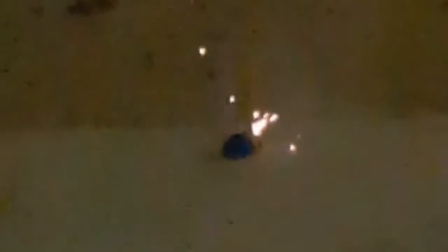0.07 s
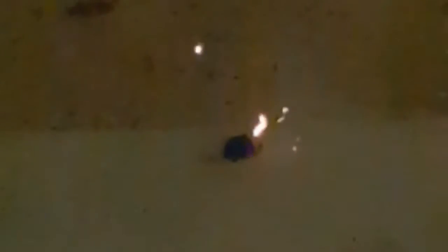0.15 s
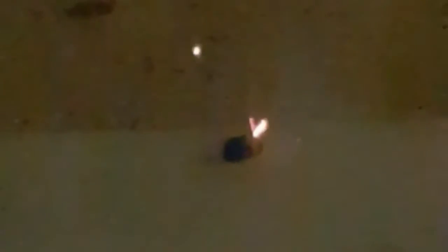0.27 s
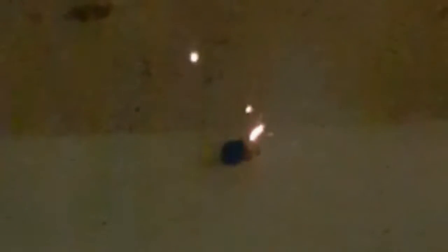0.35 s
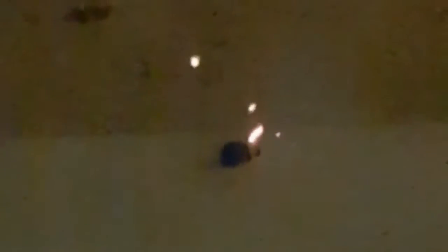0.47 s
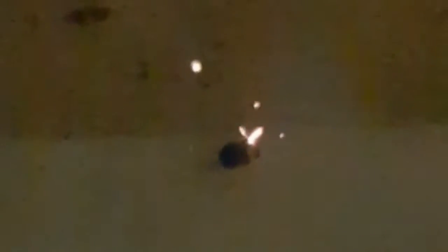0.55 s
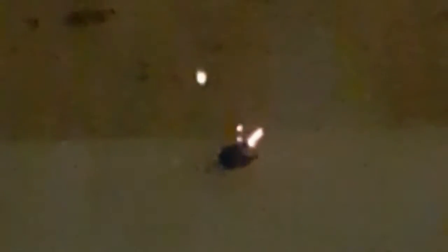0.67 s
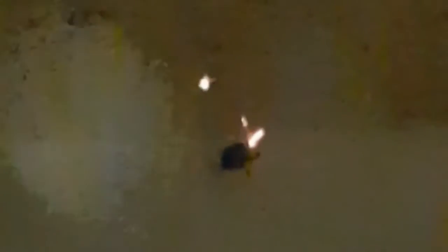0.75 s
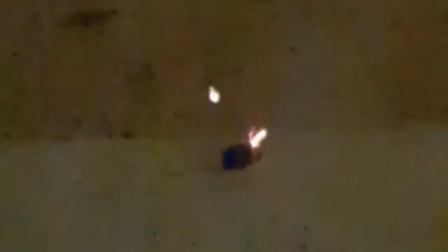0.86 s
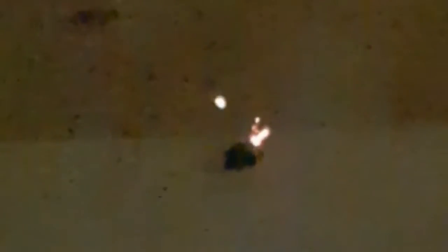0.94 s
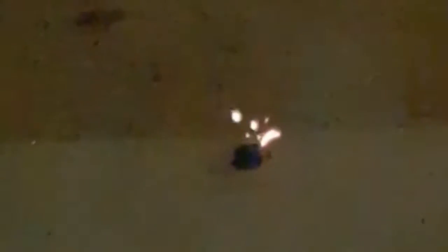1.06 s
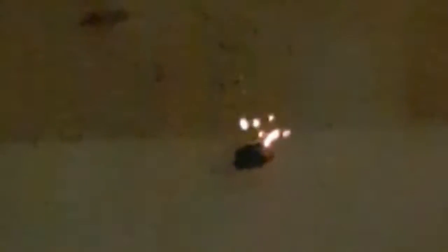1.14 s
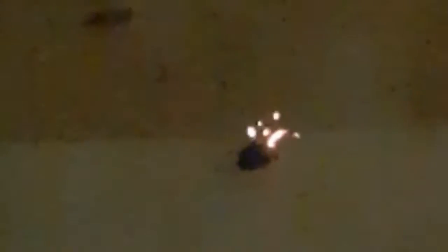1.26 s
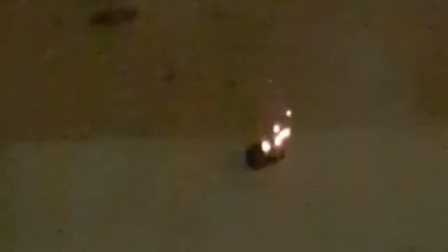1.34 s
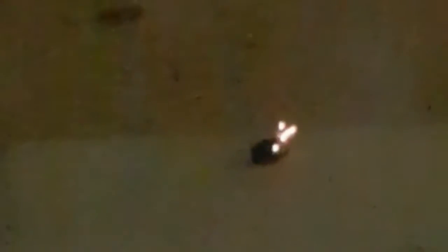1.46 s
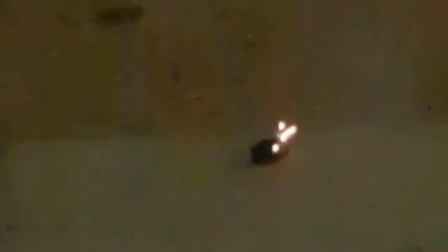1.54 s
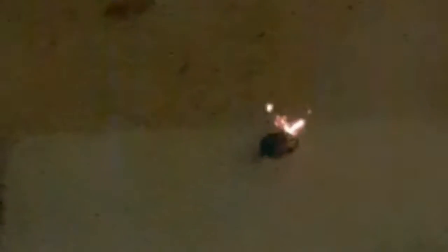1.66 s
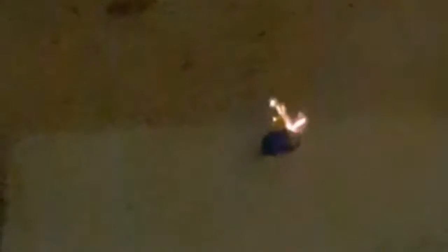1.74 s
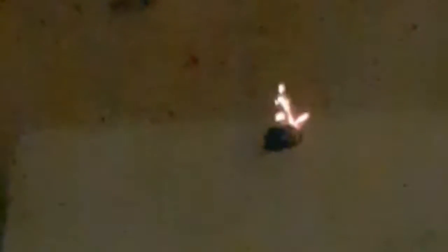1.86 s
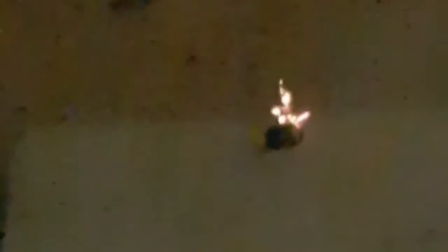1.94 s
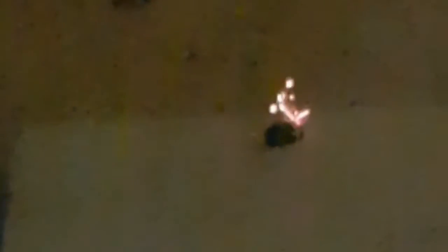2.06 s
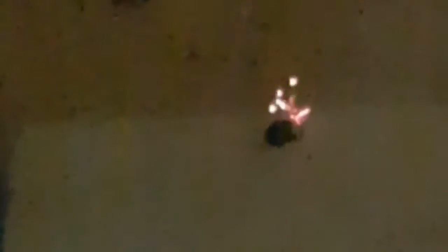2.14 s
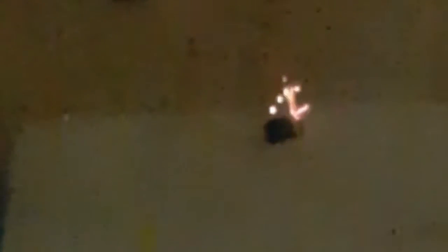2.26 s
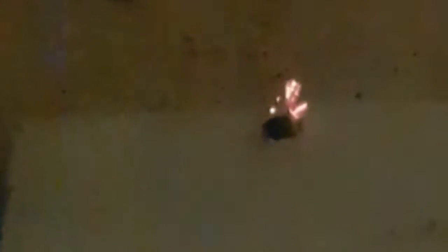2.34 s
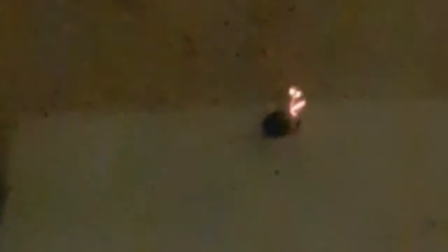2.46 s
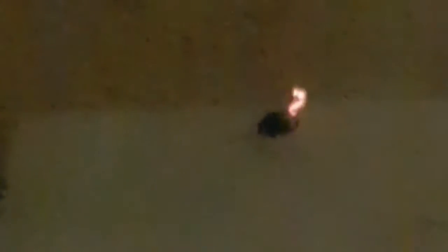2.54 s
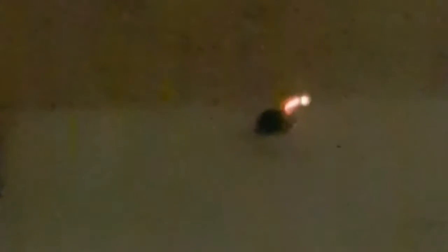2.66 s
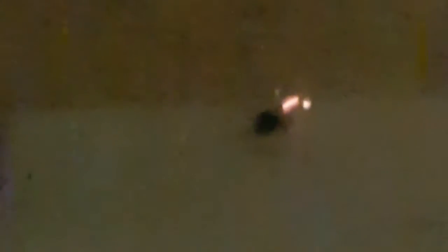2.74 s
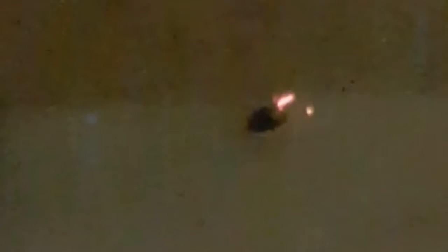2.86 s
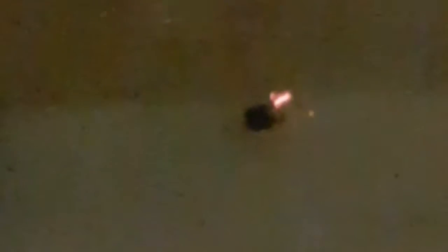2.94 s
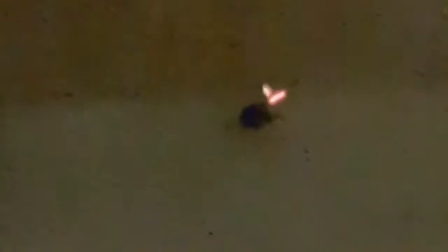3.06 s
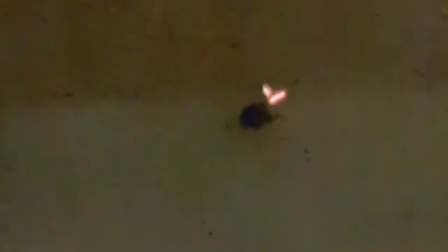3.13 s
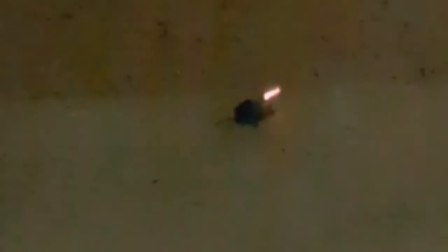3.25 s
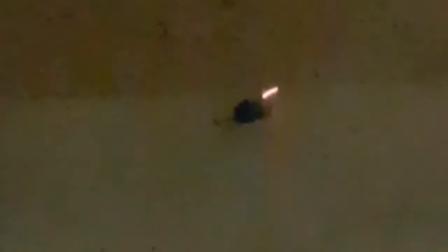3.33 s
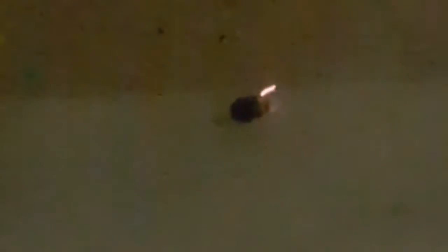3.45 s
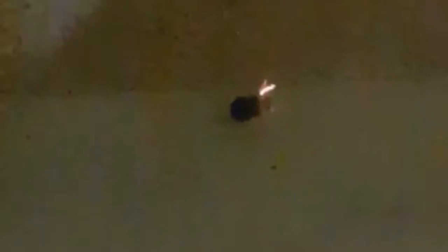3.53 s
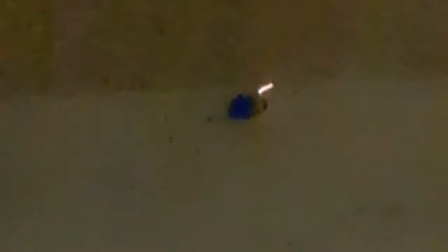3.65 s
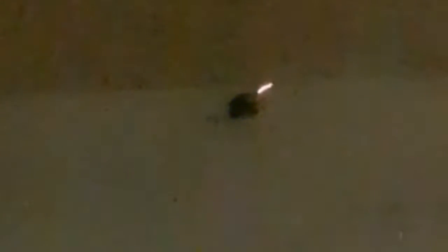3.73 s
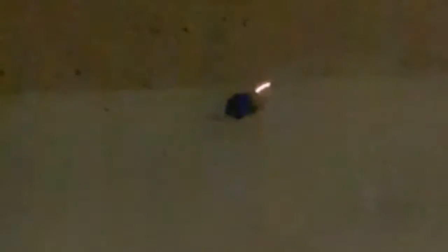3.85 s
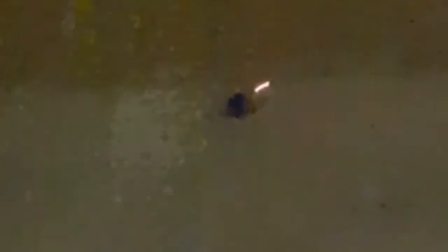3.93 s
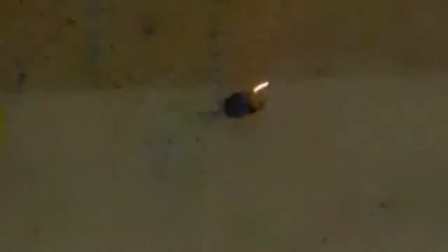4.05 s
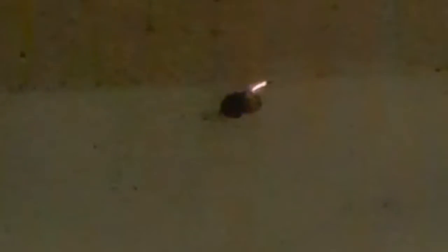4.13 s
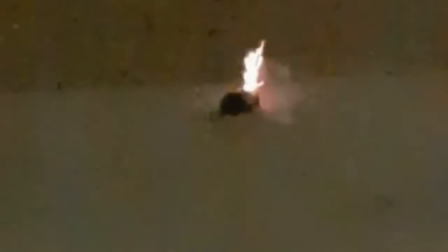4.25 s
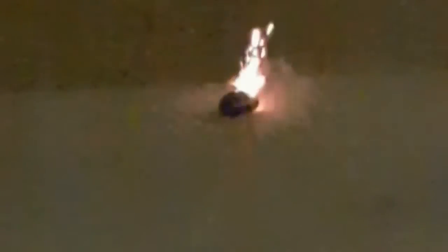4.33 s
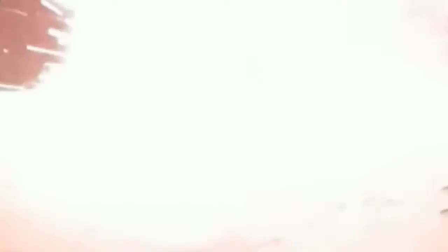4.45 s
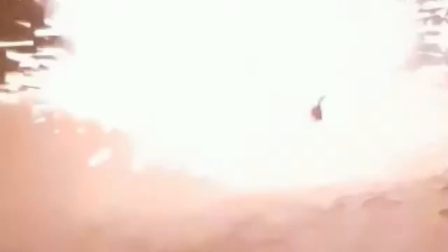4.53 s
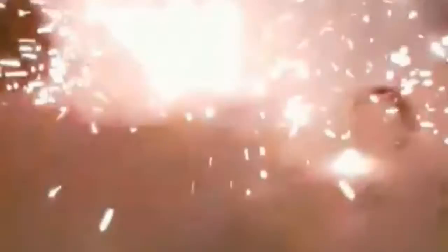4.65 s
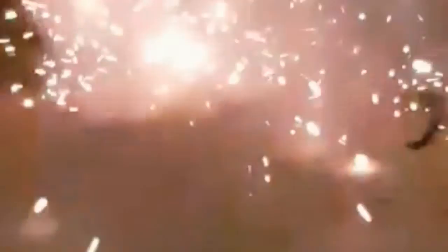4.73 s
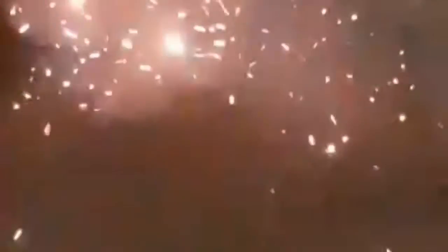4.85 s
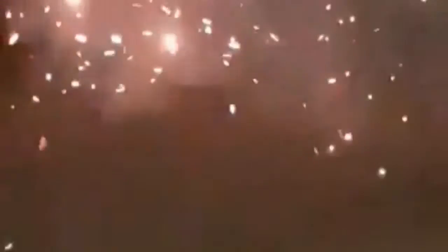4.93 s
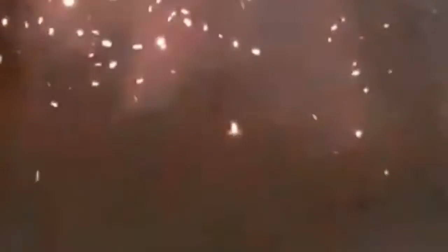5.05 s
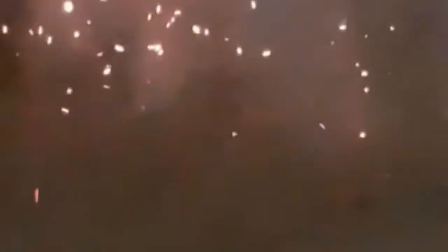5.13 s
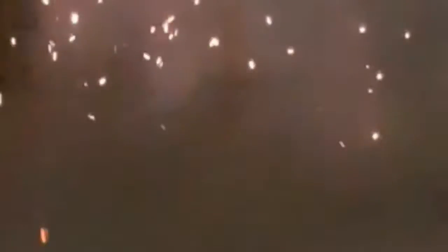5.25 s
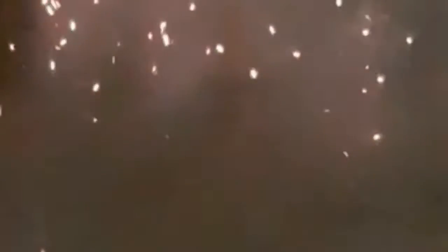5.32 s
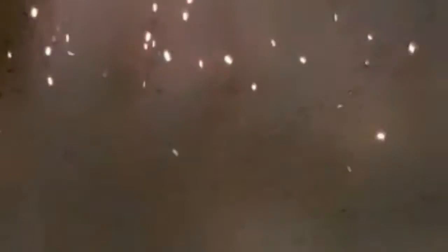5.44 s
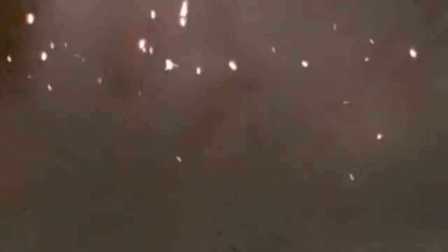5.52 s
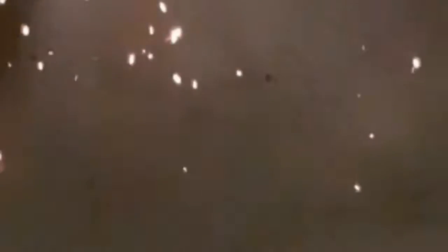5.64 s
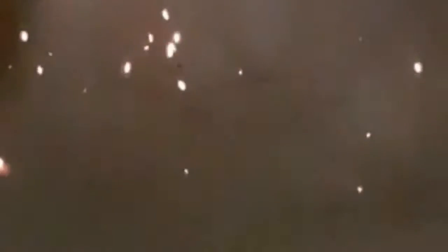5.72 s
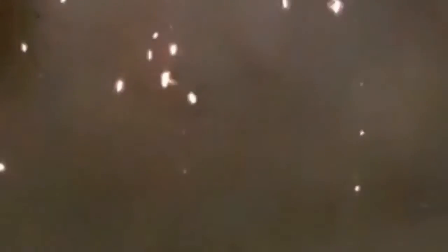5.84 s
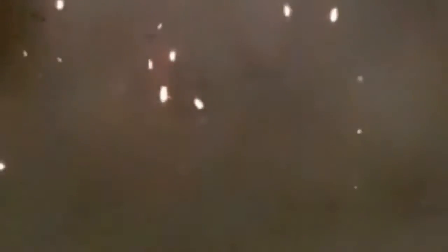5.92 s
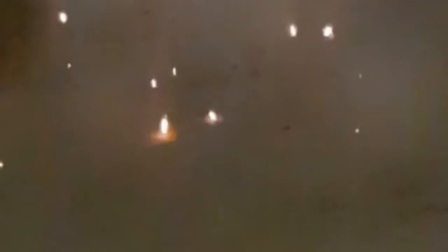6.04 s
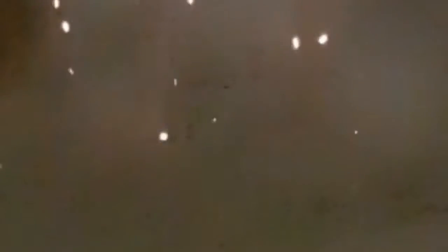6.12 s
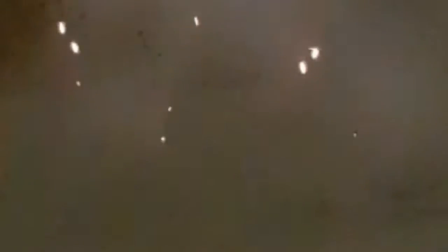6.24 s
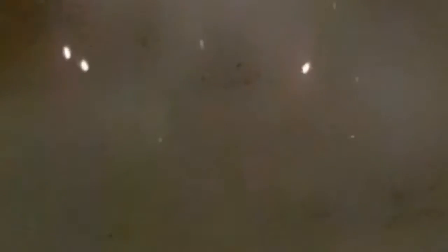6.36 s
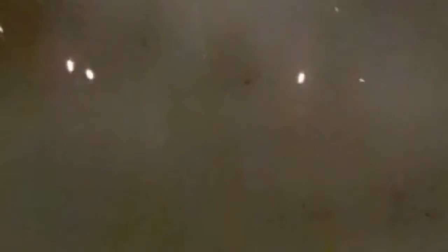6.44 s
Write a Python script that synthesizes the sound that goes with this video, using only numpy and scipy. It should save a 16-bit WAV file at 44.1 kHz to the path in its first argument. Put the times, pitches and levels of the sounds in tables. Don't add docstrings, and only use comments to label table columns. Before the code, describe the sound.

A quiet, dull street bed with a fluttering low engine pulse, faint motor hums and sparse fuse spits leads to one sudden firecracker blast, clipped and torn at the microphone. The background ducks away, and house fronts throw back knocks, slaps and deep booms. The wide, rolling rumble swells, then sinks. The sound is slowed and bass-heavy, with a faint metallic treble haze.

```python
import sys
import numpy as np
from scipy import signal
from scipy.fft import rfft, irfft
from scipy.io import wavfile
from scipy.ndimage import uniform_filter1d

SR = 44100
rng = np.random.default_rng(int(sys.argv[2]) if len(sys.argv) > 2 else 0)


def gain_from_db(level_db):
    decades = np.asarray(level_db, float) / 20
    return 10 ** decades


def persist_wave(psi):
    counts = np.round(np.clip(psi, -1, 1) * 32767).astype(np.int16)
    wavfile.write(sys.argv[1], SR, np.atleast_2d(counts).T)


N = 286190
TIME = np.arange(N) / SR
FREQ = np.fft.rfftfreq(N, 1 / SR)

# (time [s], level [dB])
IDLE_LEVEL = [(0, -41), (.5, -42), (1.1, -44), (1.5, -37.5), (2.4, -35.5), (3.4, -33.5), (3.9, -42.5),
              (4.15, -34.5), (4.6, -33)]
# (time [s], rate [cycles/s])
IDLE_RATE = [(0, 7.41), (3.6, 7.41), (4.6, 7.3)]
# (multiple of cycle rate, level [dB])
ENGINE_ORDERS = [(3, -17.5), (4, -10.5), (5, -12), (6, 0), (7, -10), (8, -6), (9, -9.5)]
# (time [s], peak [dB], pitch [Hz], length [ms])
MOTOR_SWELLS = [
    (.63, -35.5, 150, 41),
    (1.9, -35.5, 188, 50),
    (3.67, -28.5, 148, 33),
    (4.2, -33.5, 153, 61),
    (4.22, -37, 400, 53),
    (4.47, -31, 422, 30),
]
# (frequency [Hz], density [dB])
STREET_COLOUR = [(20, -8), (50, -7.5), (90, -15), (150, -11), (230, -13), (390, -8.5), (500, -12),
                 (570, -16), (1050, -25.5), (1200, -23), (1500, -32.5), (2000, -33), (2890, -37.5),
                 (3800, -49), (6000, -61)]
# (frequency [Hz], side minus mid [dB])
STREET_SIDE = [(60, -28), (110, -19.5), (200, -16.5), (380, -14), (700, -8.5), (1290, -8), (2380, -6.5),
               (4400, -9), (8120, -17), (15000, -9)]
# (time [s], swell [dB])
TRAFFIC_SWELL = [(0, 0), (.4, -1), (.75, 2.5), (1.1, 1.5), (2.1, 2.5), (2.55, 4), (3.3, 4.5), (3.65, 3),
                 (4.0, 5), (4.3, 5.5), (4.6, 4)]
# (level [dB], share of swell [0-1.5])
STREET_RANGES = [
    (-41, 0.68),
    (-38.5, 0.6),
    (-47, 1.15),
    (-52.5, 0.07),
    (-63, 1.2),
]
# (time [s], peak [dB], pitch [Hz], length [ms])
SPUTTERS = [(.02, -43, 2600, 9.5), (.217, -52, 895, 4), (.528, -44, 2690, 14), (.533, -47, 3800, 16),
            (.543, -39, 2660, 10), (.594, -45, 3880, 1.3), (.6, -44, 2700, 14), (.6, -49, 3800, 12),
            (.757, -43, 2900, 4), (.781, -38, 2560, 4), (.84, -31.5, 2600, 2.6), (.84, -39, 3870, 2.2),
            (.84, -39, 1800, 3), (.84, -29.5, 1080, 5), (1.357, -49, 2800, 6), (1.75, -39, 1980, 4.2)]
# (start [s], end [s])
OVERLOADS = [
    (4.63, 4.679),
    (4.7838, 4.7915),
]
# (start [s], end [s], left size [0-1], right size [0-1])
RATTLES = [
    (4.64, 4.6426, .75, .75),
    (4.6443, 4.6449, .08, .6),
    (4.6464, 4.649, .1, .22),
    (4.664, 4.6649, .02, .08),
]
# (time [s], level [-1..1], stuck [ms], swing [Hz])
LEFT_THROWS = [
    (4.6426, .82, 2, 50),
    (4.6442, -.93, .8, 95),
    (4.649, -.84, 4, 50),
    (4.6524, .95, .5, 50),
    (4.6649, -.56, 3, 50),
    (4.6673, -.09, 9, 50),
    (4.782, -.85, 5, 100),
]
# (time [s], level [-1..1], stuck [ms], swing [Hz])
RIGHT_THROWS = [(4.6426, .82, 2, 50), (4.6442, -.8, 1, 50), (4.6449, .95, 1, 50), (4.6451, -.9, .2, 90),
                (4.6473, .68, 2, 50), (4.649, -.8, 3, 50), (4.6514, .9, 1.1, 55), (4.6649, .98, 1, 50),
                (4.6655, -.95, 1, 50), (4.6658, .96, 2, 50), (4.6669, -.55, 1, 50), (4.6673, .45, .5, 15),
                (4.782, -.8, 5, 50), (4.78645, .6, 1, 50), (4.78677, -.9, .4, 100)]
# (frequency [Hz], density [dB/Hz])
RUMBLE_COLOUR = [(15, -15), (28, -4.5), (48, -3), (80, -5.5), (125, -8.5), (218, -14), (300, -16),
                 (460, -17), (650, -22), (1080, -27.5), (1730, -37.5), (2720, -42), (3500, -53),
                 (6000, -74)]
# (frequency [Hz], side minus mid [dB])
RUMBLE_SIDE = [(60, -26), (110, -17), (200, -14.5), (380, -8), (700, -5.5), (1290, -8), (2380, -5),
               (4400, -10), (8120, -1), (15000, -8)]
# (crest level [dB], rise before [dB/s], fall after [dB/s])
RUMBLE_RANGES = [
    (-10.5, 2, 16.5),
    (-21.5, 3, 17.5),
    (-30.5, 15, 16),
    (-42, -7.5, 22.5),
]
# (time [s], lift [dB], length [ms], centre [Hz])
ECHO_WAVES = [(4.685, 11.5, 25, 500), (4.753, 10.5, 7.8, 45), (4.87, 6.5, 40, 500), (4.95, 12.5, 15.6, 790),
              (5.068, 10, 42, 810), (5.16, 2, 50, 45), (5.21, 7.5, 64, 1190), (5.402, 4, 51, 245),
              (5.41, 3, 100, 3000), (5.55, 1, 67, 1500), (5.68, 2, 130, 100), (5.9, 4.5, 88, 350),
              (6.32, 3.5, 110, 300)]
# (time [s], peak [dB], pitch [Hz], length [ms])
SLAPS = [(4.807, -39, 1501, 4), (4.944, -15, 930, 11), (4.945, -28, 2700, 2), (4.966, -28, 2520, 4.6),
         (4.999, -18, 980, 6.5), (5.05, -24, 2000, 11), (5.062, -35, 2800, 6.5), (5.081, -17, 2530, 3),
         (5.091, -37, 2590, 3), (5.121, -26, 2530, 5.8), (5.217, -33, 2400, 4.5), (5.236, -12, 1000, 8.2),
         (5.89, -34, 900, 3)]
# (time [s], peak [dB], pitch [Hz], length [ms])
THUDS = [
    (4.712, 0, 217, 7),
    (4.838, -4.5, 108, 8.1),
    (4.997, -1, 126, 15.6),
    (5.113, -5, 136, 11),
    (5.146, -9, 61, 19),
    (5.265, -2, 49.7, 31),
    (5.39, -8, 88.5, 14),
    (5.46, -8, 75.5, 15),
    (5.595, -8.5, 118, 6),
    (5.97, -17, 48.7, 24),
]
# (frequency [Hz], left minus right [dB])
PORTS = [(60, 0.5), (110, 0.5), (200, 0), (380, -3), (700, -1.5), (1290, 0.5), (2380, 2), (4400, 0.5),
         (8120, -3), (15000, -1.0)]
# (thirds of hold rate, level [dB])
UNEVEN_STEPS = [
    (1, -11.5),
    (2, -9),
    (4, -11),
]

LOUDEST_ORDER, LEAD_TURNS, SWEEP_TURNS = 6, .26, .1
DRONE_HZ, DRONE_DB = 15.25, -45
DUCK_S, DUCK_DB = 4.62, -17.5
FORERUN_S, FORERUN_HZ, FORERUN_DB = 4.6355, 750, -23
RECOVER_S, OVERLOAD_HZ = .0075, 3000
CREST_S, WAVE_OCTAVES = 5.325, 2.13
HOLD_HZ, TOP_HZ = 11997.4, 15830


def curves(table):
    s, *columns = np.transpose(table)
    return [np.interp(TIME, s, c) for c in columns]


def at_hz(table, hz):
    f, db = np.transpose(table)
    return np.interp(np.log(np.maximum(hz, 1)), np.log(np.maximum(f, 1)), db)


def walk(rate_hz):
    k = int(SR / rate_hz)
    steps = np.repeat(rng.standard_normal(N // k + 1), k)
    return 1.2 * uniform_filter1d(uniform_filter1d(steps, k), k)[:N]


def wash(colour, side, edges_hz, levels_db, flicker_db, shared_db):
    shape = gain_from_db(at_hz(colour, FREQ))
    reach = np.clip(FREQ / 250 - .5, 0, 1)
    comb = gain_from_db(1.82 * walk(SR / 130)[:len(FREQ)] * reach)
    mid, apart = (comb * shape * rfft(rng.standard_normal(N)) for _ in range(2))
    pair = mid + np.array([[1], [-1]]) * gain_from_db(at_hz(side, FREQ)) * apart
    ranges = list(zip(edges_hz, edges_hz[1:]))
    unit_db = [10 * np.log10(2 * np.sum(shape[(FREQ >= lo) & (FREQ < hi)] ** 2) / N) for lo, hi in ranges]
    gains_db = np.array(levels_db) - np.c_[unit_db]
    centres = np.log([np.sqrt(lo * hi) for lo, hi in ranges])
    out = 0
    for octave in np.arange(4, 13, .5):
        hz = 2 ** octave
        slope = np.clip(1 - 2 * np.abs(np.log2(FREQ + 1) - octave), 0, 1)
        place = np.interp(np.log(hz), centres, np.arange(len(ranges)))
        low = min(int(place), len(ranges) - 2)
        db = gains_db[low] + (place - low) * (gains_db[low + 1] - gains_db[low])
        db = db + flicker_db * walk(12) + shared_db * min(hz / 1500, 1)
        out = out + gain_from_db(db) * irfft(pair * slope, N)
    return out


def bursts(table, apart, spread=1.214):
    out = np.zeros((2, N))
    t = np.arange(8192) / SR
    for s, db, hz, ms in table:
        noise = rng.standard_normal((2, len(t)))
        noise[1] = noise[0] + apart * noise[1]
        noise[:, 0] += 6 * np.sqrt(2500 / hz)
        band = signal.butter(2, [hz / spread, hz * spread], "band", fs=SR, output="sos")
        puff = signal.sosfilt(band, noise) * np.exp(-t / (ms / 1000))
        i = int(s * SR)
        out[:, i:i + len(t)] += gain_from_db(db) * puff / np.abs(puff).max()
    return out


def engine_throb(turns):
    throb = 0
    for k, db in ENGINE_ORDERS:
        above = k - LOUDEST_ORDER
        lead = .56 + LEAD_TURNS * above + SWEEP_TURNS * above ** 2
        throb = throb + gain_from_db(db + 0.83 * walk(2.68)) * np.cos(2 * np.pi * (k * turns + lead))
    return gain_from_db(curves(IDLE_LEVEL)[0]) * throb / np.std(throb)


def drone():
    return gain_from_db(DRONE_DB + 2.6 * walk(1.1)) * np.sin(2 * np.pi * DRONE_HZ * TIME)


def traffic(turns):
    swell_db = curves(TRAFFIC_SWELL)[0]
    levels_db = [db + share * swell_db for db, share in STREET_RANGES]
    flutter_db = 1.1 * np.cos(2 * np.pi * (turns + .2)) + 1.1 * walk(60)
    edges_hz = [80, 250, 650, 1400, 2400, 3500]
    return wash(STREET_COLOUR, STREET_SIDE, edges_hz, levels_db, 0.3, flutter_db)


def fuse():
    return bursts(SPUTTERS, 0.87, spread=1.09)


def far_motor():
    out = 0
    for s, db, hz, ms in MOTOR_SWELLS:
        length_s = ms / 1000
        swell = np.exp(-((TIME - s - length_s) / length_s) ** 2)
        out = out + gain_from_db(db) * swell * np.sin(2 * np.pi * hz * TIME)
    return out


def street():
    turns = np.cumsum(curves(IDLE_RATE)[0]) / SR
    duck = gain_from_db(DUCK_DB * np.clip((TIME - DUCK_S) / 0.003, 0, 1))
    return duck * (engine_throb(turns) + drone() + far_motor() + traffic(turns) + fuse())


def forerun():
    rise = np.clip((TIME - FORERUN_S) / .004, 0, 1) * (TIME < RATTLES[0][0])
    return gain_from_db(FORERUN_DB) * rise * (1 + np.sin(2 * np.pi * FORERUN_HZ * (TIME - FORERUN_S)))


def rattle():
    noise = rng.standard_normal((2, N))
    noise[1] = noise[0] + 1.3 * noise[1]
    band = signal.sosfilt(signal.butter(1, [1600, 2800], "band", fs=SR, output="sos"), noise)
    size = sum(np.outer(sizes, (TIME >= t0) & (TIME < t1)) for t0, t1, *sizes in RATTLES)
    return size * np.tanh(9 * band)


def throws(table):
    out = np.zeros(N)
    for s, position, stuck_ms, swing_hz in table:
        i = int(s * SR)
        free_s = np.maximum(TIME[i:i + 2048] - s - stuck_ms / 1000, 0)
        out[i:i + 2048] = position * np.exp(-free_s / RECOVER_S) * np.cos(2 * np.pi * swing_hz * free_s)
    return out


def overloaded_blast():
    thrown = np.array([throws(LEFT_THROWS), throws(RIGHT_THROWS)]) + rattle() + forerun()
    return signal.lfilter(*signal.butter(2, OVERLOAD_HZ, fs=SR), thrown)


def roll_db(edges_hz):
    since_s = TIME - CREST_S
    out = []
    for (db, rise, fall), lo, hi in zip(RUMBLE_RANGES, edges_hz, edges_hz[1:]):
        waves_db = 0
        for s, lift_db, ms, hz in ECHO_WAVES:
            octaves = np.log2(np.sqrt(lo * hi) / hz) / WAVE_OCTAVES
            waves_db = waves_db + lift_db * np.exp(-((TIME - s) * 1000 / ms) ** 2 - octaves ** 2)
        trend_db = np.where(since_s < 0, rise * np.maximum(since_s, -1), -fall * since_s)
        out.append(db + trend_db + waves_db)
    return out


def rumble():
    edges_hz = [25, 150, 500, 1500, 4500]
    roll = wash(RUMBLE_COLOUR, RUMBLE_SIDE, edges_hz, roll_db(edges_hz), 1.58, 1.75 * walk(45))
    roll = gain_from_db(1.0) * roll + bursts(SLAPS, 1.0) + bursts(THUDS, 0.23)
    limited = roll / (1 + roll ** 4) ** .25
    return (TIME > np.mean(OVERLOADS[0])) * limited


def scene():
    lost = sum((TIME >= t0) & (TIME < t1) for t0, t1 in OVERLOADS)
    lost = uniform_filter1d(1. * lost, size=100)
    tilt = gain_from_db(np.outer([.5, -.5], at_hz(PORTS, FREQ)))
    air = irfft(tilt * rfft(street() + (1 - lost) * rumble()), N)
    return air + lost * overloaded_blast()


def roll_off(x):
    return signal.sosfilt(signal.butter(12, 16430, fs=SR, output="sos"), x)


def record(dry):
    fade = np.clip(.5 + (HOLD_HZ / 2 - FREQ) / 1200, 0, 1)
    slow = irfft(rfft(dry) * fade, N)
    beat = 2 * np.pi * HOLD_HZ * TIME
    sampled = slow * (1 + 2 * np.cos(beat))
    slope = np.gradient(slow, axis=1) * SR / (2 * np.pi * HOLD_HZ)
    uneven = slope * sum(2 * gain_from_db(db) * np.cos(beat * k / 3) for k, db in UNEVEN_STEPS)
    edge = np.clip((TOP_HZ - FREQ) / 150, 0, 1)
    droop = np.sinc(FREQ / HOLD_HZ)
    held = irfft((rfft(sampled) * droop + rfft(uneven)) * edge, N)
    return roll_off(np.clip(held, -1, 1))


dry = scene()
out = record(dry)
persist_wave(out)
```